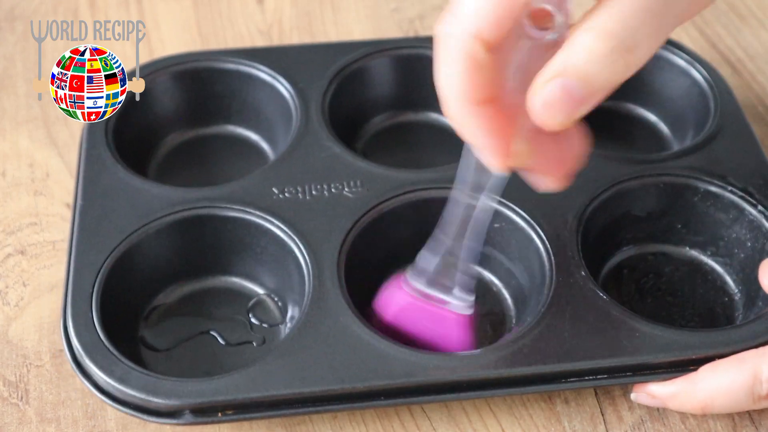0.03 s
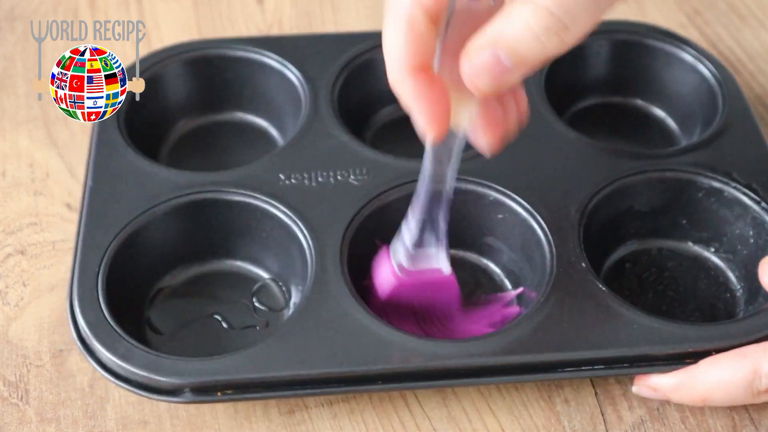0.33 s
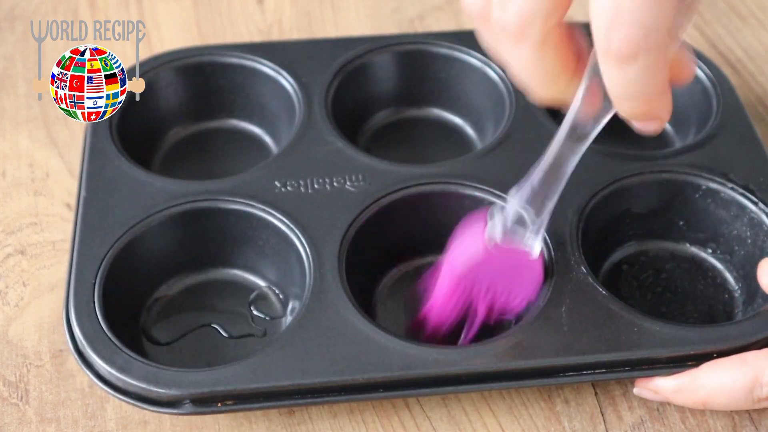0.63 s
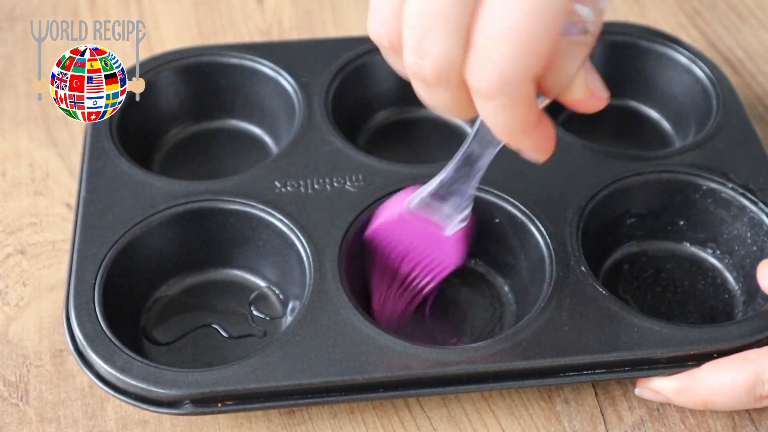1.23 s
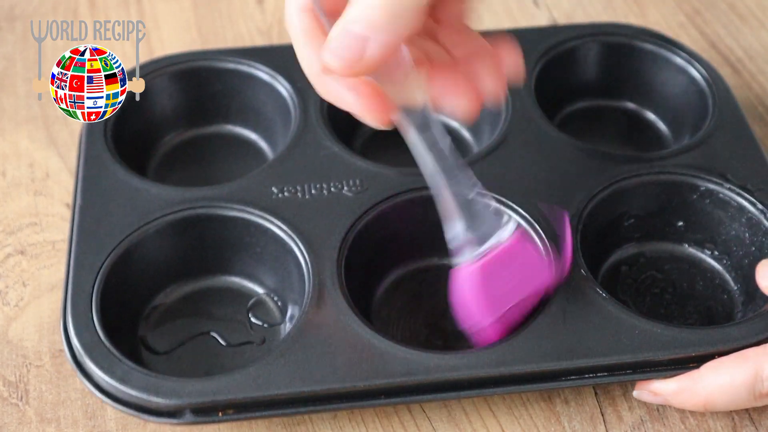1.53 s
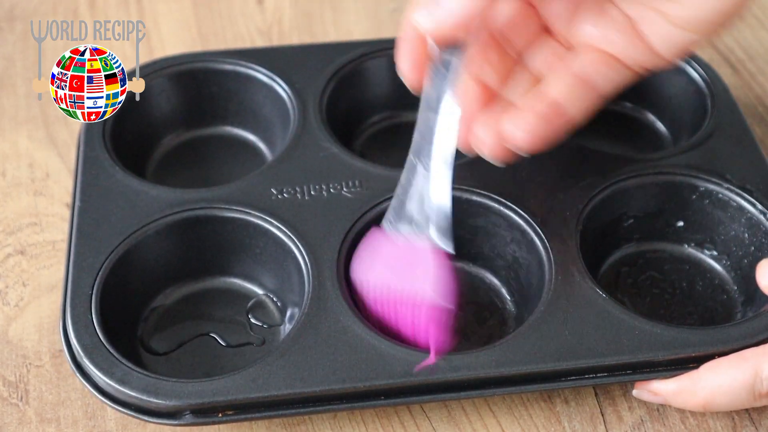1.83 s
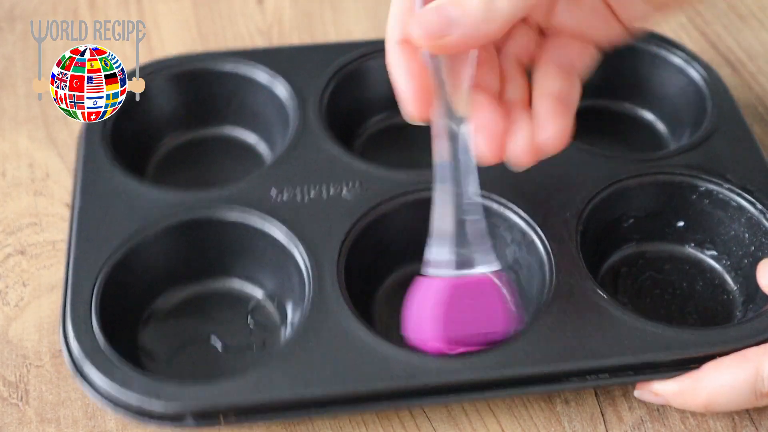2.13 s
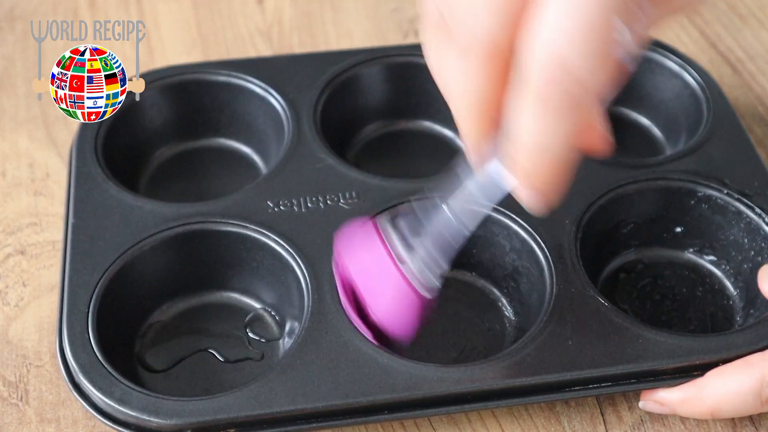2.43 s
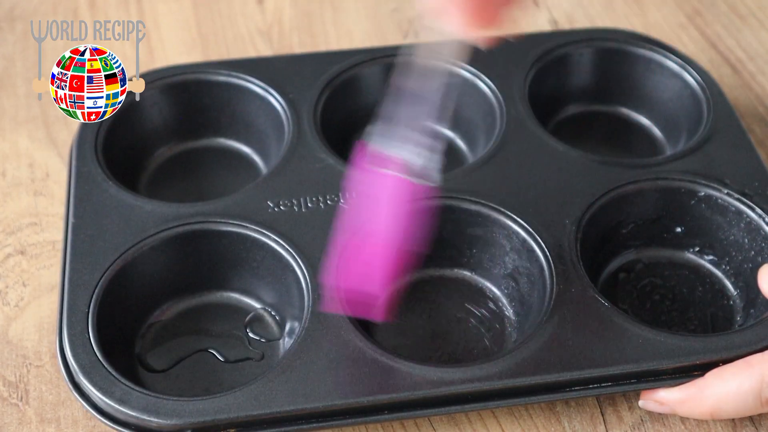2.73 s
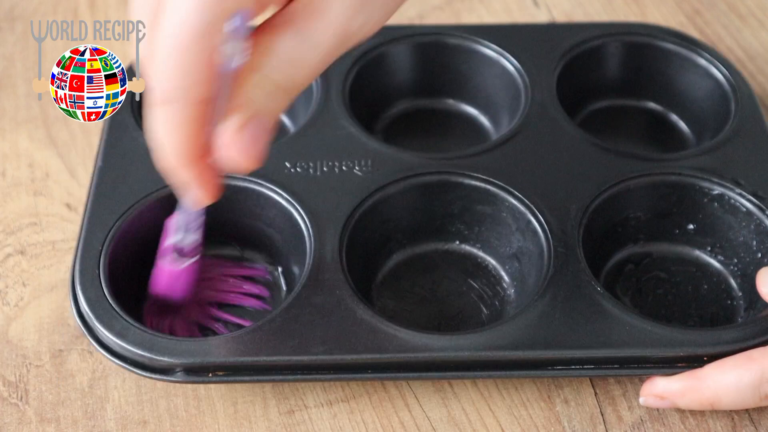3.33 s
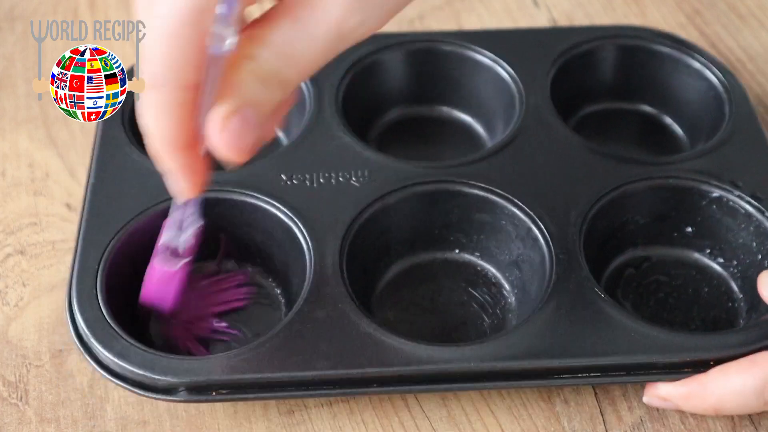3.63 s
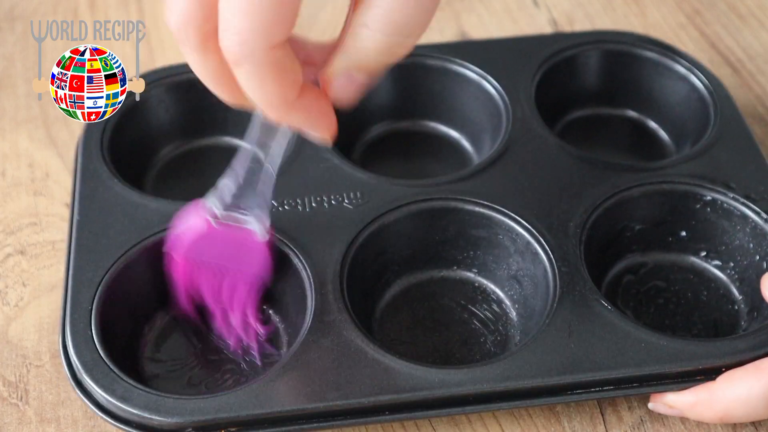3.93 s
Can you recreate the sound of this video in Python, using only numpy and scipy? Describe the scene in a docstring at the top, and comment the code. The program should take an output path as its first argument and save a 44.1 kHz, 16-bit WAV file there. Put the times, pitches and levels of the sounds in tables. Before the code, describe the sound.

A silicone brush quietly rubs and taps inside the cups of a metal muffin tin.

```python
"""A kitchen counter, close up in stereo: a silicone brush very quietly oils a metal muffin tin.
From the start its bristles slip over the steel and ring the cups; the head bumps the wall, the oil
film snaps and the rubber squeaks faintly. After a second the strokes thin out, then pick up at
2.2 s and press hardest near 3.3 s, where the tray booms, before easing off.
A mains hum and the even hiss of the room lie under it all."""
import sys
import numpy as np
from scipy import signal
from scipy.fft import rfft, irfft
from scipy.io import wavfile

SR = 44100
rng = np.random.default_rng(int(sys.argv[2]) if len(sys.argv) > 2 else 0)


def digitize_waveform(pressure):
    """Quantize a signal to 16-bit integers and store it at the path in sys.argv[1].

    Rows of a 2-D input are taken as channels; values are limited to [-1, 1].
    """
    field = np.atleast_2d(pressure).T
    bounded = np.clip(field, -1, 1)
    quanta = np.round(bounded * 32767).astype(np.int16)
    wavfile.write(sys.argv[1], SR, quanta)


N = 176400

# Brush strokes. Each row: peak time in seconds, length in seconds, then cup ring, tray boom and
# bristle swish in relative dB.
BRUSH_STROKES = [(.005, 0.097, -4, -16.5, -7), (0.143, 0.099, -6.5, -34, -8), (0.312, 0.11, -4.5, -10, 0),
                 (0.464, 0.086, -5.5, -35, -11), (0.63, 0.22, -17.5, -28, -11), (1.03, 0.23, -26, -17, -25),
                 (1.596, 0.092, -11, -23, -8.5), (2.219, 0.095, -4.5, -17.5, -4.5),
                 (2.447, 0.1, -12, -36, -3), (2.57, 0.038, -2, -15, 0), (2.657, 0.054, -11, -34, -13),
                 (3.016, 0.078, -6.5, -20, -5.5), (3.15, 0.071, -2, -14, -2), (3.314, 0.058, 3, 2.5, 4),
                 (3.359, 0.056, 2.5, 1, 3.5), (3.497, 0.091, 5, 0.5, 3.5), (3.656, 0.064, 4, -1.5, 2),
                 (3.812, 0.071, 0.5, -8, 0), (3.989, 0.074, -9.5, -11, -9)]
# The head meets the cup wall. Each row: start in seconds, cup knock and tray thud in relative dB.
HEAD_BUMPS = [(.107, -1.5, -12), (.2545, -3.5, -11), (.722, -3, -6.5), (2.9828, -.5, -9), (3.2465, -10, -3),
              (3.2865, -2, -7), (3.3135, -8, 1), (3.3238, 7, 6), (3.4695, 2, -9), (3.4955, 0, 3.5),
              (3.6315, -7, -10), (3.7965, -5, -15)]
# Snapping oil and flicking bristles. Each row: start in seconds, level in relative dB, centre in Hz,
# spread as a ratio to either side, decay in seconds.
OIL_SNAPS = [(0.0646, -1, 3020, 1.2, 0.0019), (.065, -7, 5000, 1.6, .002), (0.1038, -8, 2420, 1.4, 0.0036),
             (.131, -13, 7400, 1.13, .008), (.141, -13, 4200, 1.1, .004), (.177, -14, 6700, 1.5, 0.0093),
             (0.226, -8, 3750, 1.3, 0.0034), (0.251, -7.5, 3430, 1.4, 0.0061), (0.2596, 2, 4860, 2, 0.002),
             (0.509, -17.5, 7200, 1.3, 0.012), (0.584, -10, 8000, 1.3, 0.0041),
             (0.601, -10, 7000, 1.35, .003), (0.816, -15, 4900, 1.7, 0.0066),
             (1.1867, -14, 6960, 1.4, .003), (1.594, -26, 4200, 0.98, 0.0094),
             (2.4932, -7, 7400, 1.15, 0.0038), (2.5434, -7, 7500, 1.5, .004),
             (2.5445, 4, 6070, 1.1, 0.0029), (2.5452, -5.5, 3120, 1.07, 0.0038),
             (2.567, -6, 7000, 2, 0.0022), (2.688, -9, 10000, 1.1, 0.001), (2.982, -12, 3200, 1.2, 0.0051),
             (2.9848, -10, 6900, 1.06, 0.006), (3.028, -16, 3900, 1.4, .004),
             (3.233, -7.5, 5000, 1.6, 0.0024), (3.252, -5.5, 8000, 1.5, 0.0024),
             (3.617, -6.5, 3940, 1.03, 0.0026), (3.832, -11, 6000, 1.3, .002)]
# Rubber squeaks. Each row: start in seconds, length in seconds, level in dB.
RUBBER_SQUEAKS = [(0.657, 0.025, -78), (0.694, 0.091, -78), (1.032, 0.059, -84), (1.128, 0.05, -80),
                  (2.397, 0.078, -71.5)]
# Modes of the tin. Each row: frequency in Hz, level in relative dB, seconds to fall by 60 dB.
TIN_MODES = [(258, -1.5, 0.13), (337.5, -1, 0.089), (354, -1.5, 0.08), (431, -5.5, 0.12), (529.5, -2, 0.15),
             (596, -3.5, 0.085), (634, -11, 0.043), (755, -8, 0.045), (867, -5, 0.069), (906, 2, 0.091),
             (923.5, -6.5, 0.088), (1019, -2.5, 0.098), (1031, -5, 0.18), (1333, -7.5, 0.034),
             (1986, -2, 0.023), (2095, -9, 0.034), (2340, -10, 0.023), (3083, -20.5, 0.029),
             (3620, -21, 0.01), (3990, -28.5, 0.051), (6190, -22, 0.019), (7260, -46, 0.009),
             (8730, -29, 0.026), (11550, -26, 0.025)]
# Colours of the sliding bristles and oily crackle. Each row: frequency in Hz, level in relative dB.
SWISH_COLOUR = [(150, -44), (400, 23), (1300, 5.5), (2400, 9), (3400, 3.5), (5200, -1), (6500, -16),
                (8600, -3), (10500, -6), (11700, -28), (12600, -3), (15000, -46)]
CRACKLE_COLOUR = [(800, -17), (2000, 22.5), (3300, -14), (6000, 4.5), (9000, -11), (12000, -1),
                  (14000, -29)]
# Width of the brush sounds at the microphone. Each row: frequency in Hz, side over mid in dB.
STEREO_WIDTH = [(100, -5), (350, -22), (900, -11.5), (1500, -5), (2500, 1.5), (3200, -4), (5000, -1.5),
                (12000, 4.5)]
# Steady tones in the kitchen. Each row: frequency in Hz, level in dB.
HUM_TONES = [(49, -71.5), (100, -50.5), (200, -65), (300, -73.5), (339, -69.5), (400, -77), (490, -77.5),
             (528, -80.5), (595, -80.5)]
# Room tone in the mid and side channels. Each row: frequency in Hz, level in relative dB.
ROOM_MID_COLOUR = [(20, -20), (45, -1.5), (80, 1), (130, 3), (240, 3.5), (400, -7), (700, -7), (1000, -8.5),
                   (1350, -14), (1750, -7.5), (2100, -11), (2700, -21.5), (4000, -26.5), (4600, -27),
                   (5900, -28), (7700, -26), (12300, -29), (13000, -41), (15000, -50)]
ROOM_SIDE_COLOUR = [(30, -14), (90, -18), (150, -6.5), (290, -4.5), (550, -5), (860, -7), (1350, -10),
                    (1830, -3.5), (2700, -13.5), (3600, -18), (4600, -18), (5800, -21), (7700, -17),
                    (12300, -21.5), (13000, -27.5), (15000, -51)]
# Narrow humps in the hiss. Each row: centre in Hz, half width in Hz, lift in dB.
HISS_HUMPS = [(4560, 370, 5.5), (7170, 190, 9), (8580, 100, 4), (10800, 58, 3.5), (13300, 29, 8)]

BOOM_BELOW_HZ, GLINT_ABOVE_HZ = 790, 2800
TRAY_MODES = [m for m in TIN_MODES if m[0] < BOOM_BELOW_HZ]
CUP_MODES = [m for m in TIN_MODES if BOOM_BELOW_HZ <= m[0] < GLINT_ABOVE_HZ]
GLINT_MODES = [m for m in TIN_MODES if m[0] >= GLINT_ABOVE_HZ]

CUP_DB, BOOM_DB, GLINT_DB, SWISH_DB, CRACKLE_DB = -57, -52, -73.5, -64, -69.5
BUMP_DB, SNAP_DB, SNAP_RING_DB = -23.3, -49.5, -19
KNOCK_HZ, KNOCK_FALLOFF_DB, KNOCK_T60_S, THUD_T60_S = 900, 14, 0.06, 0.055
SNAP_TOP_HZ, SNAP_ATTACK_S = 12500, 0.0008
SQUEAK_HZ, OVERTONE_HZ, OVERTONE_DB = 4090, 8460, -8
ROOM_T60_S, ROOM_TAIL_DB = 0.17, -9.5
LOW_CUT_HZ, HIGH_CUT_HZ = 39, 14800


def brushing():
    """Slipping bristles swish and crackle, ring the cup with a glint on top and make the tray boom."""
    cup_db, boom_db, swish_db = np.transpose(BRUSH_STROKES)[2:]
    sliding = pressure(swish_db, lead_s=0.013)
    cup = amp(CUP_DB) * ring(slips() * pressure(cup_db, lead_s=0.01), CUP_MODES)
    boom = amp(BOOM_DB) * ring(slips() * pressure(boom_db), TRAY_MODES)
    glint = amp(GLINT_DB) * ring(slips() * sliding, GLINT_MODES)
    swish = amp(SWISH_DB) * unit(colour(slips(), SWISH_COLOUR)) * sliding
    return cup + boom + glint + swish + oil_crackle() * sliding


def slips(per_s=2500, spread_db=1, max_lift_db=4):
    """Single bristles let go in tiny random impulses, a few of them larger."""
    size = amp(np.minimum(spread_db * rng.exponential(1, N), max_lift_db))
    direction = rng.choice([-1., 1.], N)
    slipping = rng.random(N) < per_s / SR
    return unit(size * direction * slipping)


def pressure(levels_db, lead_s=0):
    """The push of the brush: each stroke swells quickly and dies away more slowly."""
    t = np.arange(N) / SR + lead_s
    power = np.zeros(N)
    for (peak, length, *_), db in zip(BRUSH_STROKES, levels_db):
        width = length * np.where(t < peak, 0.43, 0.67)
        power += amp(db) ** 2 * np.exp(-((t - peak) / width) ** 2)
    return np.sqrt(power)


def ring(force, modes, attack_s=0.0063):
    """A force sets the steel ringing in damped modes."""
    t = np.arange(SR // 4) / SR
    # Dividing by the root of t60 keeps a long mode from carrying more energy.
    body = sum(amp(db - 60 * t / t60) / np.sqrt(t60) * np.sin(2 * np.pi * hz * t)
               for hz, db, t60 in modes)
    body *= 1 - np.exp(-t / attack_s)
    return signal.fftconvolve(force, body / np.linalg.norm(body))[:N]


def head_bumps():
    """The soft head knocks on the cup and thuds the tray; both die away quickly under its touch."""
    knock, thud = np.zeros((2, N))
    for start, knock_db, thud_db in HEAD_BUMPS:
        add(knock, start, amp([knock_db]))
        add(thud, start, amp([thud_db]))
    cup = [(hz, db - KNOCK_FALLOFF_DB * abs(np.log2(hz / KNOCK_HZ)) ** 0.5, KNOCK_T60_S)
           for hz, db, _ in CUP_MODES + GLINT_MODES]
    tray = [(hz, db, THUD_T60_S) for hz, db, _ in TRAY_MODES]
    return amp(BUMP_DB) * (ring(knock, cup, attack_s=0.0015) + ring(thud, tray, attack_s=0.0015))


def oil_snaps():
    """Each film of oil breaks with a short spit that also rings the tin's upper modes."""
    spits = np.zeros(N)
    t = np.arange(SR // 20) / SR
    for start, db, hz, spread, decay in OIL_SNAPS:
        spread = max(spread, 1.1)
        edges_hz = [hz / spread, min(hz * spread, SNAP_TOP_HZ)]
        band = signal.butter(2, edges_hz, "band", fs=SR, output="sos")
        noise = unit(signal.sosfilt(band, rng.standard_normal(len(t))))
        envelope = np.exp(-t / decay) * (1 - np.exp(-t / SNAP_ATTACK_S))
        add(spits, start, amp(db + SNAP_DB) * noise * envelope)
    return spits + amp(SNAP_RING_DB) * ring(spits, GLINT_MODES)


def oil_crackle():
    """Single oily bristles unstick in sparse, uneven ticks."""
    ticks = slips(per_s=590, spread_db=6.5, max_lift_db=19.5)
    return amp(CRACKLE_DB) * unit(colour(ticks, CRACKLE_COLOUR))


def rubber_squeaks():
    """Silicone sticks and slips on the coating in a thin, stuttering tone with one overtone."""
    out = np.zeros(N)
    for start, length, db in RUBBER_SQUEAKS:
        progress = np.arange(0, 1, 1 / (length * SR))
        pitch_ratio = 1 + 0.017 * wander(rate_hz=600)[:len(progress)]
        phase_per_hz = 2 * np.pi * np.cumsum(pitch_ratio) / SR
        tone = np.sin(phase_per_hz * SQUEAK_HZ) + amp(OVERTONE_DB) * np.sin(phase_per_hz * OVERTONE_HZ)
        grip = wander(rate_hz=70)[:len(progress)]
        envelope = np.sin(np.pi * progress ** 0.37) ** 0.5
        add(out, start, amp(db) * unit(tone * grip * envelope))
    return out


def kitchen(direct):
    """The direct sound reaches the microphone with a short room tail; returns mid and side."""
    t = np.arange(SR // 3) / SR
    reflections = rng.standard_normal((2, len(t))) * (rng.random((2, len(t))) < 0.1)
    reflections *= amp(-60 * t / ROOM_T60_S) * (t > 0.004)  # none in the first 4 ms
    tail_mid, tail_side = [amp(ROOM_TAIL_DB) * signal.fftconvolve(direct, taps / np.linalg.norm(taps))
                           for taps in reflections]
    shifted = signal.hilbert(direct).imag  # sets left and right apart in phase
    return direct + tail_mid[:N], colour(shifted + tail_side[:N], STEREO_WIDTH)


def appliance_hum():
    """Mains hum and faint motor tones, each wavering slightly in level and phase."""
    t = np.arange(N) / SR
    out = np.zeros(N)
    for hz, db in HUM_TONES:
        level = amp(db) * np.sqrt(2) * (1 + 0.0072 * wander(rate_hz=7.2))
        phase = 2 * np.pi * (hz * t + rng.random()) + 0.015 * wander(rate_hz=6)
        out += level * np.sin(phase)
    return out


def room_tone(curve, db):
    """Even background noise with narrow humps in its hiss; the level wanders by about 1 dB."""
    f = np.fft.rfftfreq(N, 1 / SR)
    humps_db = sum(lift * np.exp(-((f - hz) / width) ** 2) for hz, width, lift in HISS_HUMPS)
    noise = irfft(rfft(rng.standard_normal(N)) * amp(humps_db), N)
    return amp(db + wander(rate_hz=9.5)) * unit(colour(noise, curve))


def amp(db):
    """Decibels to gain."""
    return 10 ** (np.asarray(db) / 20)


def unit(x):
    """Scales to rms 1."""
    return x / np.sqrt(np.mean(x ** 2) + 1e-20)


def add(mix, start_s, sound):
    """Mixes a sound in at its start time."""
    part = mix[max(round(start_s * SR), 0):][:len(sound)]
    part += sound[:len(part)]


def colour(x, curve):
    """Filters by a curve. Each row: frequency in Hz, gain in dB."""
    hz, db = np.transpose(curve)
    f = np.fft.rfftfreq(len(x), 1 / SR)
    gain = amp(np.interp(np.log(f + 1), np.log(hz), db))
    return irfft(rfft(x) * gain, len(x))


def wander(rate_hz):
    """Smooth random motion of rms 1."""
    f = np.fft.rfftfreq(N, 1 / SR)
    return unit(irfft(rfft(rng.standard_normal(N)) / (1 + (f / rate_hz) ** 4), N))


def scene():
    """Brush and tin on the counter with the humming kitchen behind, as left and right."""
    mid, side = kitchen(oil_snaps() + brushing() + head_bumps() + rubber_squeaks())
    mid += appliance_hum() + room_tone(ROOM_MID_COLOUR, db=-58.5 - 1)
    side += room_tone(ROOM_SIDE_COLOUR, db=-61.5)
    return np.array([mid + side, mid - side])


def record(dry):
    """The microphone's low cut and band limit."""
    low_cut = signal.butter(4, LOW_CUT_HZ, "high", fs=SR, output="sos")
    high_cut = signal.firwin(511, HIGH_CUT_HZ, window=("kaiser", 9), fs=SR)
    return signal.oaconvolve(signal.sosfilt(low_cut, dry), high_cut[None], "same")


dry = scene()
out = record(dry)
digitize_waveform(out)
```